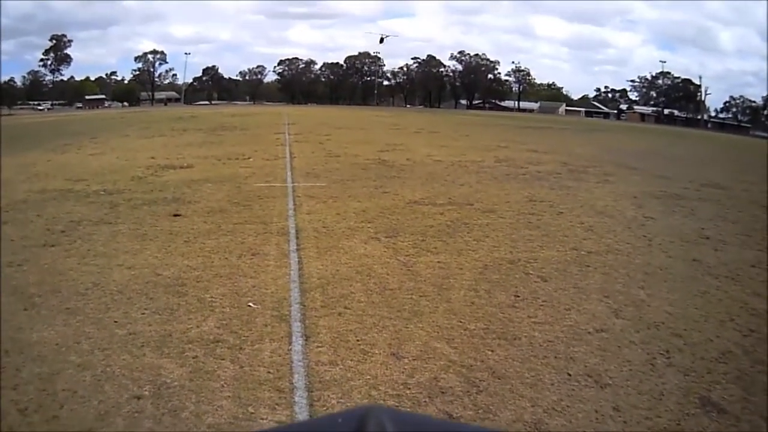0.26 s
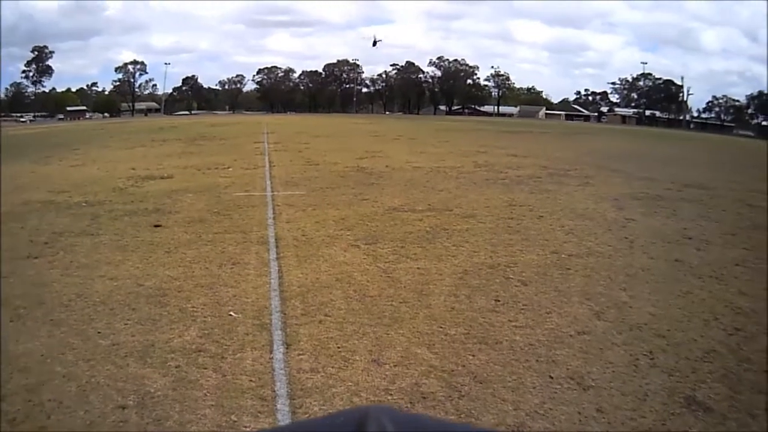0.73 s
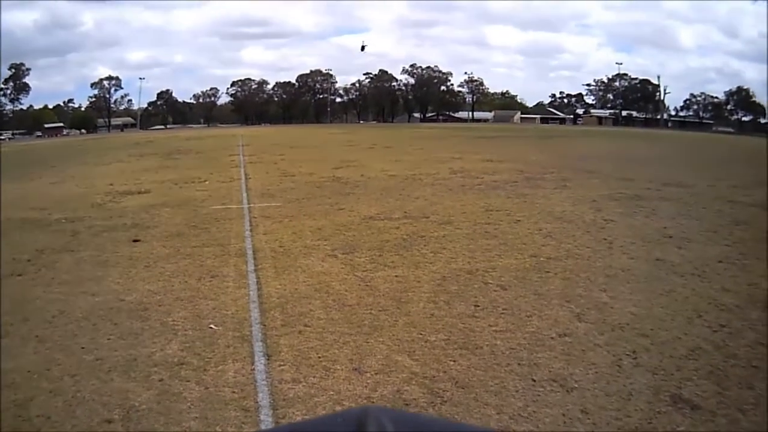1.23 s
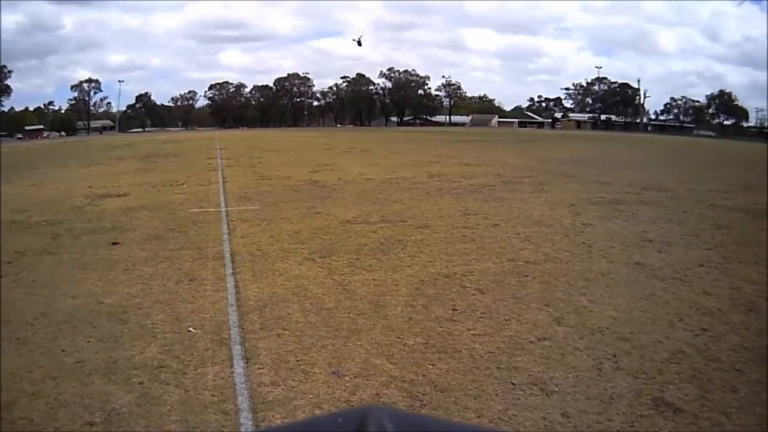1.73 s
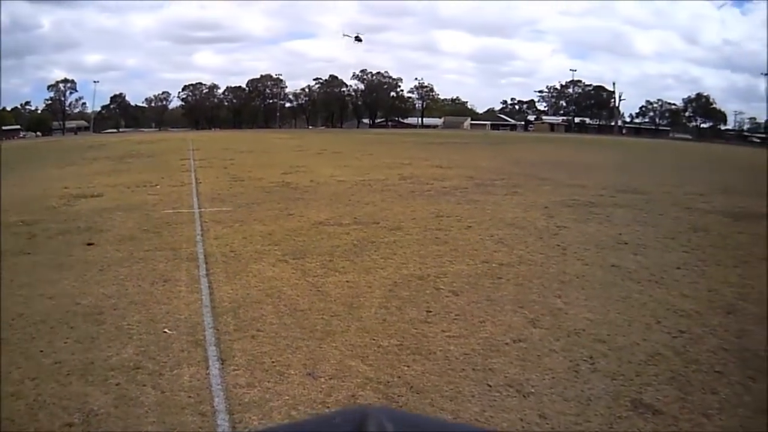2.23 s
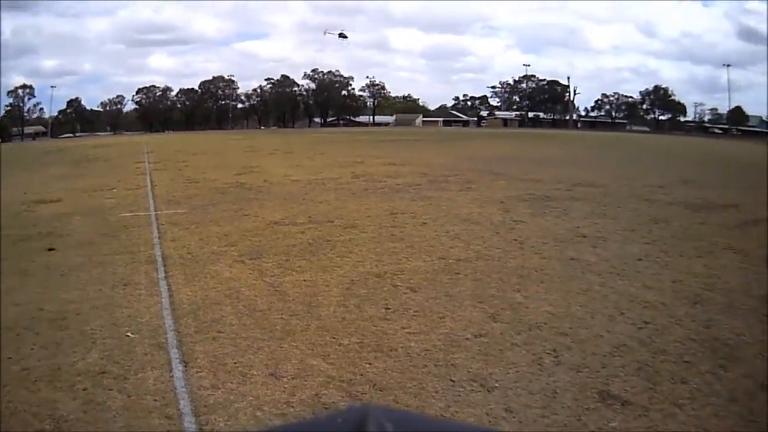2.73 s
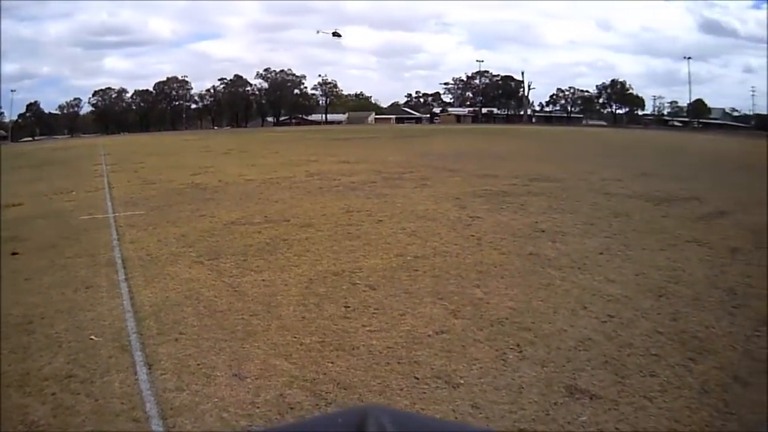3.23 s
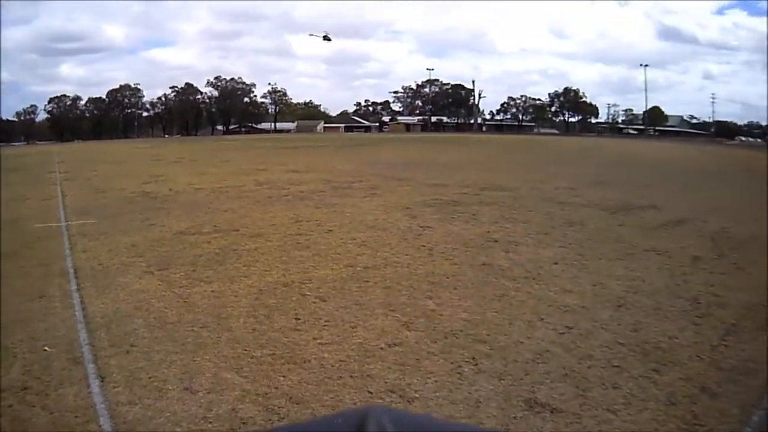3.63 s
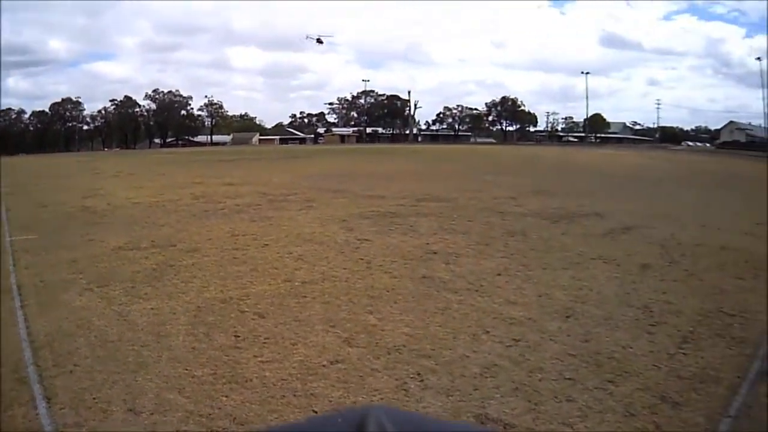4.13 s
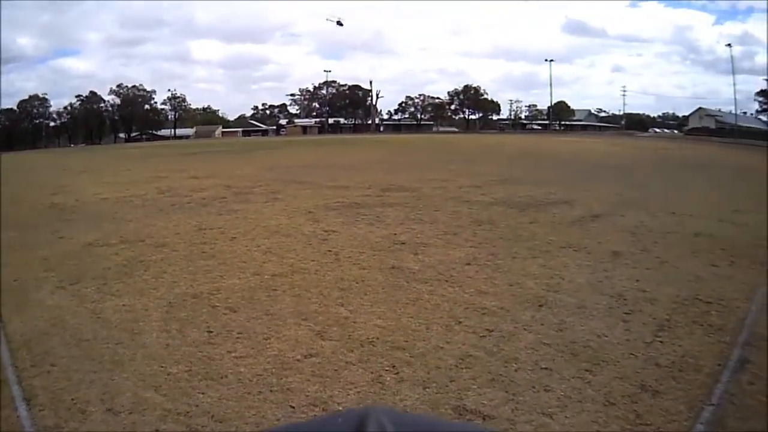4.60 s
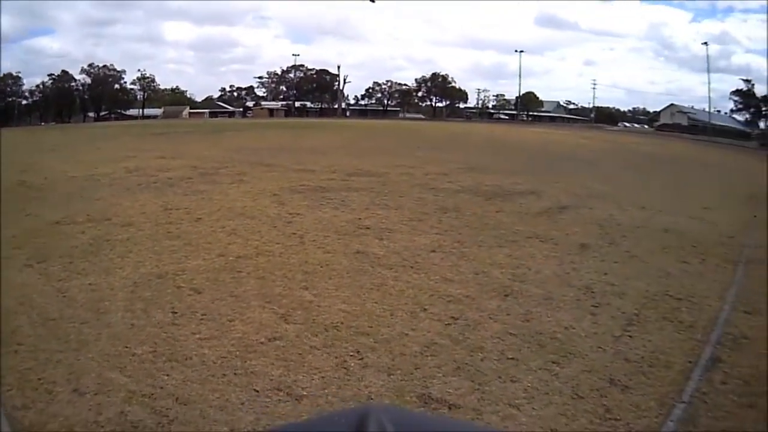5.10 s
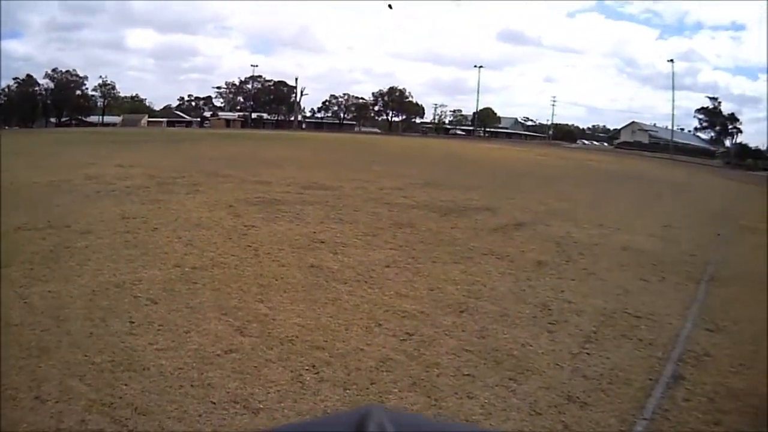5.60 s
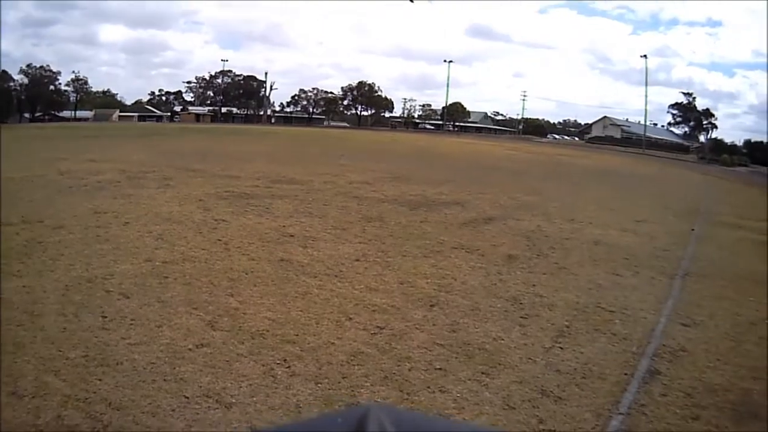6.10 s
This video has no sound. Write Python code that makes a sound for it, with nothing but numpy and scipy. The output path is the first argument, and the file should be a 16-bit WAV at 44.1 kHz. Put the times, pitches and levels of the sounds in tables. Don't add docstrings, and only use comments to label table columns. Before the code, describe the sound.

Gusts rumble against an outdoor microphone, over a faint steady high gear whine and rapid rotor flutter from a small electric helicopter.

```python
import sys
import numpy as np
from scipy import signal
from scipy.fft import rfft, irfft
from scipy.io import wavfile
from scipy.ndimage import uniform_filter1d

SR = 44100
rng = np.random.default_rng(int(sys.argv[2]) if len(sys.argv) > 2 else 0)


def volts_from_decibels(level):
    exponent = np.asarray(level, float) / 20
    return 10 ** exponent


def wav_record(signal):
    frames = np.transpose(np.atleast_2d(signal))
    bounded = np.clip(frames, -1, 1)
    quanta = np.round(bounded * 32767).astype(np.int16)
    wavfile.write(sys.argv[1], SR, quanta)


N = 280035

# frequency in Hz, unsteadiness in Hz, level in dB.
FAR_HUM = [
    (101, 1.5, -29.5),
    (157, 2.5, -47),
    (315, .8, -43),
]
# time in seconds, half length in seconds, frequency in Hz, level in dB.
BIRD_CHIRP = (5.45, .07, 5960, -50)
# time in seconds, level in dB.
GUST_STRENGTH = [(0, -.5), (.4, 1.5), (.55, -3.5), (.95, 0), (1.45, -6), (1.62, -15), (1.85, -3.5),
                 (2.04, -9.5), (2.18, 1.5), (2.36, 1.5), (2.45, -6.5), (2.8, -13.5), (2.95, -6.5),
                 (3.45, -6.5), (4.02, 0), (4.3, -7.5), (4.5, -19.5), (6.35, -25.5)]
# frequency in Hz, level in dB per Hz.
WIND_SPECTRUM = [(4.7, -29), (8.0, 1.5), (37, -0.5), (186, -10), (605, -26), (1030, -35.5), (1920, -43.5),
                 (2110, -51), (2500, -61), (3250, -62), (5500, -120)]
# frequency in Hz, share of its swing, level in dB.
GUST_RESPONSE = [(35.3, 0.14, -2), (112, 0.28, -2.5), (222, 0.67, -1.5), (377, 0.83, 1), (1500, 0.84, -0.5)]
# time in s, half length in s, level in dB, size in Hz.
EDDIES_AT_PORT = [(0.426, 0.17, -3.5, 49.5), (0.484, 0.038, -5, 317), (1.04, 0.086, -6, 130),
                  (1.15, 0.036, -7.2, 49.6), (1.344, 0.08, 5.5, 30), (1.584, 0.12, -7.5, 50),
                  (1.864, 0.045, -3.5, 131), (2.056, 0.041, -1, 50), (2.15, 0.18, 2.5, 495),
                  (2.723, 0.11, -8.5, 77.4), (2.934, 0.16, 5, 49.7), (3.083, 0.15, 7, 130),
                  (3.12, 0.1, -4.5, 30), (3.187, 0.027, 4.5, 80), (3.568, 0.1, 6.0, 29.7),
                  (3.795, 0.2, 5, 126), (4.123, 0.21, 4.5, 82.5), (4.46, 0.05, -6.7, 506),
                  (4.62, 0.14, -10.5, 200), (4.836, 0.062, 7.5, 330), (4.87, 0.14, 8.5, 78),
                  (5.122, 0.14, 12.7, 340), (5.157, 0.096, 9, 30.2), (5.208, 0.043, -7, 500),
                  (5.312, 0.059, 10, 317), (5.61, 0.05, 4.5, 50), (5.78, 0.03, 10, 320),
                  (5.924, 0.13, 0.5, 30), (5.93, 0.08, -5.6, 500), (6.15, 0.22, -6, 315)]
# time in seconds, frequency in Hz.
MOTOR_PITCH = [(0, 3369), (.2, 3366), (.6, 3391), (1, 3391), (1.4, 3378), (1.65, 3372), (2, 3393),
               (2.3, 3402), (2.75, 3390), (3, 3392), (3.3, 3365), (3.6, 3345), (4, 3357), (4.5, 3376),
               (5.1, 3370), (5.4, 3350), (5.9, 3353), (6.35, 3336)]
# multiple of the motor tone, level in dB.
MOTOR_HARMONICS = [(.25, 11.5), (1, 4), (1.5, -12), (1.752, 3), (2.001, -1.5), (3.75, -15)]
# time in seconds, main gear in dB, tail gear in dB, flank shown (0-1).
SIDE_SHOWN = [(0, -44.5, -67, .1), (.8, -42.5, -54.5, 0.17), (1.5, -45.5, -69, 0.13),
              (1.82, -44.5, -55.5, 0.5), (2.0, -54, -54, 0.7), (2.3, -53, -57, 0.9),
              (2.65, -49, -51.5, 0.64), (2.8, -52, -45, 0.7), (2.95, -55, -43, .9), (3.25, -51, -44, 1),
              (3.5, -50, -50.5, .7), (3.78, -46.5, -52, 0.35), (4.0, -47, -58, 0.26), (4.4, -48, -58, 1),
              (5.0, -52, -57.5, 0.63), (5.15, -52.5, -57, 0.74), (6.35, -54, -72, 0.2)]
# time in seconds, throb in dB once a turn, throb in dB
NOSE_TURN = [(0, 2, 1, .45, .2), (1.2, 2, 2, .45, .25), (1.32, 2, 12, .25, .3), (1.55, 2, 14, .25, .3),
             (1.65, 2, 3, .85, .4), (1.9, 3, 3, .6, .5), (2.2, 11, 9, .3, .3), (3.4, 9, 8, .35, .45),
             (3.7, 10, 15, .25, .4), (4.9, 9, 13, .25, .4), (5.2, 4, 5, .3, 1.0), (6.35, 4, 5, .2, 1.6)]
# multiple of the motor tone, level in dB, throb angle in turns,
# throb depth in dB, spread of side tones in rotor orders.
MAIN_MESH = [(1.6235, 2.5, 0.45, 3, 2.5)]
MESH_OVERTONES = [(3.247, .5, 0.017, 15, 9.9)]
MESH_ODD_HARMONICS = [(.815, 5.5, 0.78, 11.4, 5.8), (2.4352, -4, .89, 20, 33)]
TAIL_GEARS = [(1.1735, 1, 0.016, 21.5, 0.3), (1.2, -11, .0, 9.7, 1.2), (1.414, -6, 0.031, 25, 5.0)]
# time in seconds, level in dB.
AIR_LEVEL = [(0, -50), (1.2, -50), (1.31, -52), (1.36, -48.5), (1.55, -52), (1.7, -48.5), (2.0, -51.5),
             (2.1, -49), (3.2, -50), (3.45, -48.5), (3.61, -50), (3.68, -46), (3.89, -53), (4.3, -50),
             (5.0, -49.5), (5.3, -51), (5.8, -51.5), (6.35, -50)]
# time in seconds, level in dB.
BLADE_LOADING = [(0, -44.5), (.7, -45.5), (1.3, -42.5), (3.25, -42.5), (4.14, -44.5), (4.58, -41.5),
                 (5.45, -41.5), (6.35, -44.5)]
# frequency in Hz, level in dB per Hz.
SWISH_SPECTRUM = [(200, -19), (340, -4.5), (387, -13), (895, -2), (1080, -5), (1340, -3), (1480, -5.5),
                  (1630, -4.5), (2600, -9.5), (2930, -16.5), (3600, -22), (4680, -37), (7920, -120)]
RASP_SPECTRUM = [(2900, -12), (3600, -9), (3850, -3), (4250, 4.5), (4800, 1.5), (5200, -0.5), (5900, -1.5),
                 (6200, -41), (6600, -47)]
HISS_SPECTRUM = [(2800, -8.5), (3500, -5), (6300, -6), (6800, -2), (7300, -5), (7750, -10.5), (8100, -2),
                 (9000, -7.5), (10300, 0), (11000, 2), (11600, -14), (13200, -10.5), (14500, -13),
                 (15700, -24)]
# frequency in Hz, depth in dB once a turn, depth in dB once a blade.
HISS_BEAT = [(3000, -13, -5), (6700, -1.4, 3.5), (8650, 2.5, 5.5), (10400, -0.5, 0.5), (11700, 3.5, 5),
             (15000, -1, 5.5)]

TURNS_PER_S, FIRST_TURN = 16.897, .152
EDDY_OCTAVES = 1.46
# dB nose on, dB gained flank on
MOTOR_SEEN, ODD_SEEN, RASP_SEEN = (-67.5, 8.6), (-67, 10.7), (-48.5, 4.7)


def rms_one(x):
    return x / np.sqrt(np.mean(np.abs(x) ** 2) + 1e-20)


def in_time(rows):
    s, *columns = np.transpose(rows)
    return [np.interp(np.arange(N) / SR, s, c) for c in columns]


def drift(rate):
    r = np.exp(-80 * np.pi * rate / SR)
    noise = rng.standard_normal(N // 40 + 2002)
    slow = signal.lfilter([1], [1, -2 * r, r * r], noise)[2000:]
    return np.interp(np.arange(N) / 40, np.arange(len(slow)), rms_one(slow))


def coloured(spectrum, patchy_db, rate, per_octave):
    hz = np.arange(N // 2 + 1) * SR / N + 1e-3
    at, level_db = np.transpose(spectrum)
    shape = volts_from_decibels(np.interp(np.log(hz), np.log(at), level_db, left=-90, right=-90))
    whole = rfft(rng.standard_normal(N)) * shape / np.sqrt(np.mean(shape ** 2))
    step = np.log2(hz / at[0]) * per_octave
    for k in range(int(np.log2(at[-1] / at[0]) * per_octave) + 2):
        band = irfft(whole * np.clip(1 - abs(step - k), 0, 1), N)
        yield at[0] * 2 ** (k / per_octave), band * volts_from_decibels(patchy_db * drift(rate))


def steady(x):
    return x / np.sqrt(uniform_filter1d(np.abs(x) ** 2, int(3 * SR / TURNS_PER_S)))


def throb(turn, angle, depth_db, count=1, sharp=1.2):
    nearness = .5 + .5 * np.cos(2 * np.pi * count * (turn - angle))
    return steady(volts_from_decibels(depth_db * nearness ** sharp))


def evened(band, hz, share):
    swell = np.sqrt(uniform_filter1d(band ** 2, int(3.0 * SR / hz)) + 1e-12)
    return band * (np.std(band) / swell) ** np.clip(share, 0, 1)


def far_hum():
    t = np.arange(N) / SR
    return sum(volts_from_decibels(db + 0.21 * drift(width)) * np.sin(2 * np.pi * hz * t + 0.28 * drift(width))
               for hz, width, db in FAR_HUM)


def bird_chirp():
    t = np.arange(N) / SR
    s, half, hz, db = BIRD_CHIRP
    envelope = np.exp(-((t - s) / half) ** 2)
    return volts_from_decibels(db) * envelope * np.sin(2 * np.pi * hz * t + 2.0 * drift(30))


def wind():
    t = np.arange(N) / SR
    coarse_t = t[::40]
    gust_db, = in_time(GUST_STRENGTH)
    at, share, level_db = np.transpose(GUST_RESPONSE)
    rows = np.arange(len(at))
    eddies = [(db * np.exp(-((coarse_t - s) / half) ** 2), size_hz)
              for s, half, db, size_hz in EDDIES_AT_PORT]
    out, flutter = 0, drift(26.6)
    for hz, band in coloured(WIND_SPECTRUM, 0.92, 9.3, per_octave=2):
        place = np.interp(np.log(hz), np.log(at), rows)
        near = np.clip(hz, at[0], 600.)
        struck_db = sum(db * np.exp(-(np.log2(near / size_hz) / EDDY_OCTAVES) ** 2)
                        for db, size_hz in eddies)
        change_db = np.interp(place, rows, share) * gust_db + np.interp(place, rows, level_db)
        change_db = change_db + np.interp(t, coarse_t, struck_db)
        change_db = change_db + 0.62 * min(place, 3) * flutter
        out = out + evened(band, hz, .6 - 0.31 * place) * volts_from_decibels(change_db)
    return volts_from_decibels(-14.5) * out


def blade_swish(turn):
    loading_db, = in_time(BLADE_LOADING)
    noise = sum(band for hz, band in coloured(SWISH_SPECTRUM, 1.68, 3.3, per_octave=4.01))
    return volts_from_decibels(loading_db + 3.5) * noise * throb(turn, .03, 0.97)


def blade_rasp(turn, flank, tail_db, shared_db):
    nose_on_db, flank_gain_db = RASP_SEEN
    level_db = nose_on_db + flank_gain_db * flank + 0.95 * shared_db
    depth_db = 5.5 + .25 * (tail_db - tail_db.mean())
    noise = sum(band for hz, band in coloured(RASP_SPECTRUM, 1.5, 5, per_octave=6))
    return volts_from_decibels(level_db + 0.5) * noise * throb(turn, .01, depth_db)


def blade_hiss(turn, air_db):
    at, turn_db, blade_db = np.transpose(HISS_BEAT)
    gusty = volts_from_decibels(0.61 * drift(13))
    slap = np.clip(1 + 0.37 * drift(9.7), 0, 1.6)
    out = 0
    for hz, band in coloured(HISS_SPECTRUM, 0.62, 2.1, per_octave=4.1):
        once = throb(turn, 0.99, np.interp(hz, at, turn_db))
        blade = throb(turn, 0.48, np.interp(hz, at, blade_db) * slap, count=2, sharp=5.6)
        level_db = 0.14 + 2.5 if hz < 11300 else -9 + 12.5
        out = out + band * once * blade * volts_from_decibels(air_db + level_db)
    return gusty * out


def gear(rows, motor_turns, turn, rough, sharp, extra=0):
    out = 0
    for multiple, level_db, angle, depth_db, spread in rows:
        teeth = 1 + extra
        for order in range(1, 13):
            for sign in (-1, 1):
                phase = 2 * np.pi * (sign * order * turn + rng.random()) + 0.43 * drift(0.41)
                size = rough * np.exp(-order / spread) * volts_from_decibels(4.1 * rng.standard_normal())
                teeth = teeth + size * np.exp(1j * phase)
        runout = .6 * multiple * np.sin(2 * np.pi * (turn - .2))
        phase = 2 * np.pi * multiple * motor_turns + runout + 0.82 * drift(6)
        tone = np.real(steady(teeth) * np.exp(1j * phase))
        out = out + volts_from_decibels(level_db + 1.8 * drift(4.3)) * tone * throb(turn, angle, depth_db, sharp=sharp)
    return np.sqrt(2) * out


def main_whine(motor_turns, turn):
    once_db, blade_db, side, rough = in_time(NOSE_TURN)
    drive = side * (np.exp(8j * np.pi * (turn - .15)) + .4 * np.exp(12j * np.pi * (turn - .4)))
    whine = gear(MAIN_MESH, motor_turns, turn, rough, 1.4, extra=drive)
    whine = whine * throb(turn, 1.0, once_db)
    return steady(whine * throb(turn, 0.38, blade_db, count=2, sharp=1))


def gears(motor_turns, turn, main_db, tail_db, flank, shared_db):
    over_db = -52.5 + 0.53 * (main_db - main_db.max()) + shared_db
    odd_db = ODD_SEEN[0] + ODD_SEEN[1] * flank + shared_db
    out = volts_from_decibels(main_db + 1.34 + .5 * shared_db) * main_whine(motor_turns, turn)
    out = out + volts_from_decibels(over_db) * gear(MESH_OVERTONES, motor_turns, turn, 2.2, 4.3)
    out = out + volts_from_decibels(odd_db) * gear(MESH_ODD_HARMONICS, motor_turns, turn, 1.2, 4.0)
    return out + volts_from_decibels(tail_db) * gear(TAIL_GEARS, motor_turns, turn, .12, 1.3)


def motor(motor_turns, flank):
    level_db = MOTOR_SEEN[0] + MOTOR_SEEN[1] * flank
    song = sum(volts_from_decibels(db + 2.0 * drift(3.5))
               * np.sin(2 * np.pi * k * motor_turns + 0.46 * max(k, 1.2) * drift(5.5))
               for k, db in MOTOR_HARMONICS)
    return volts_from_decibels(level_db - 0.5) * song


def helicopter():
    motor_hz, = in_time(MOTOR_PITCH)
    motor_turns = np.cumsum(motor_hz) / SR
    turn = FIRST_TURN + TURNS_PER_S * motor_turns / motor_hz.mean()
    main_db, tail_db, flank = in_time(SIDE_SHOWN)
    air_db = in_time(AIR_LEVEL)[0] + 0.74 * drift(8.8)
    shared_db = air_db - air_db.mean()
    blades = blade_swish(turn) + blade_rasp(turn, flank, tail_db, shared_db) + blade_hiss(turn, air_db)
    gearing = gears(motor_turns, turn, main_db, tail_db, flank, shared_db)
    return blades + gearing + motor(motor_turns, flank)


def scene():
    return (far_hum() + bird_chirp() + wind() + helicopter())[None]


def band_limit(x):
    return signal.sosfilt(signal.butter(12, 15740, fs=SR, output="sos"), x)


def record(dry):
    rounded = 2.5 * np.tanh(dry / 2.5) + .0045
    return band_limit(rounded)


dry = scene()
out = record(dry)
wav_record(out)
```